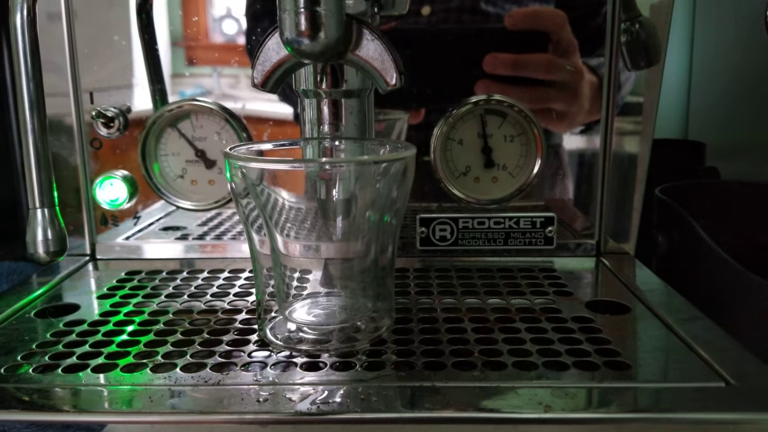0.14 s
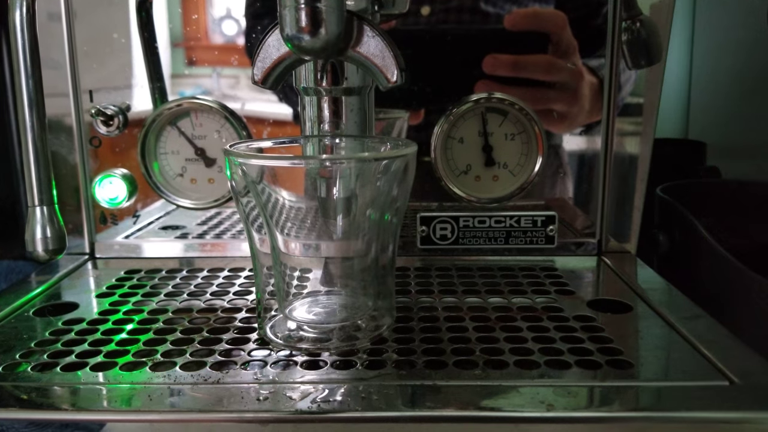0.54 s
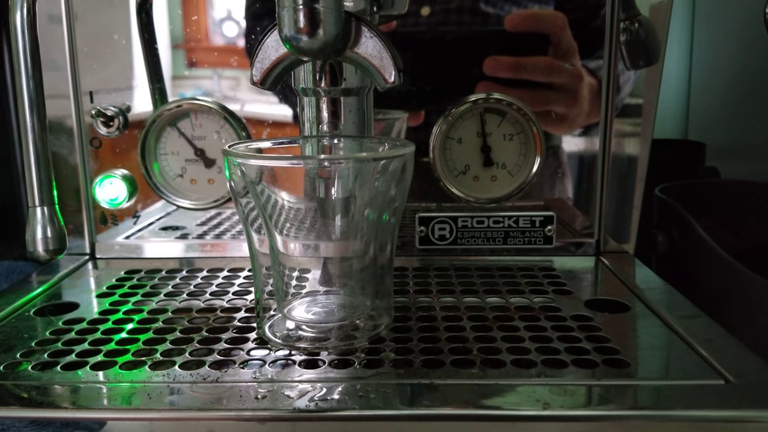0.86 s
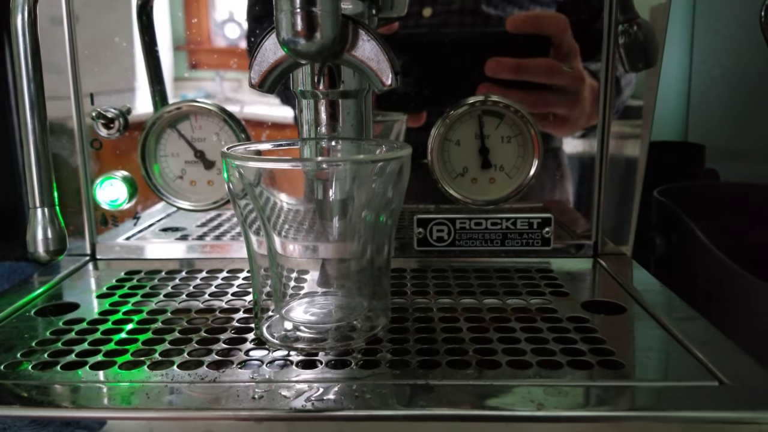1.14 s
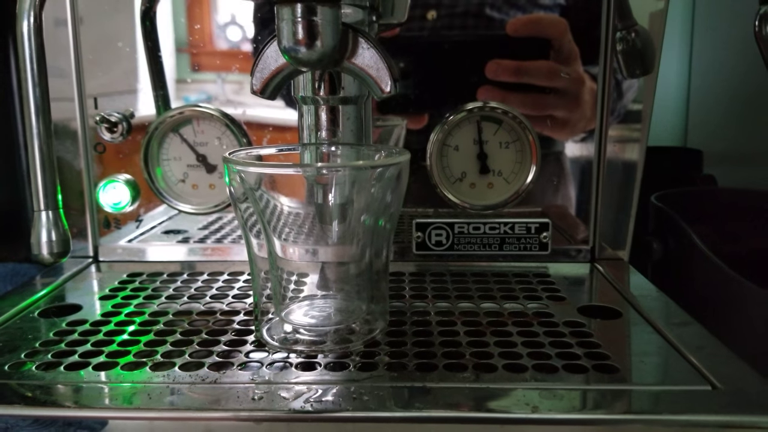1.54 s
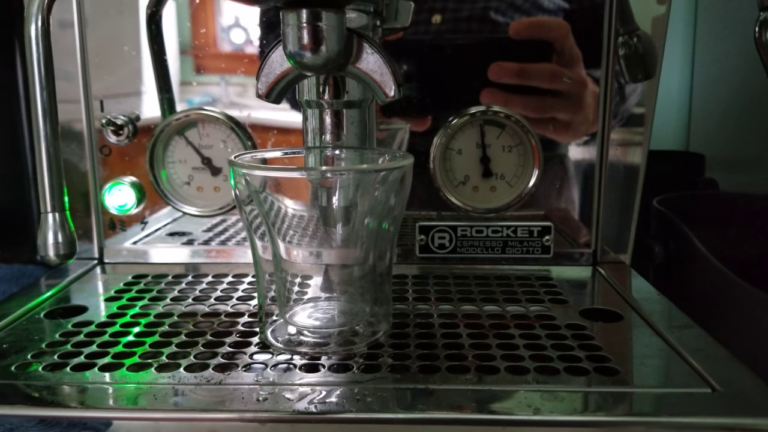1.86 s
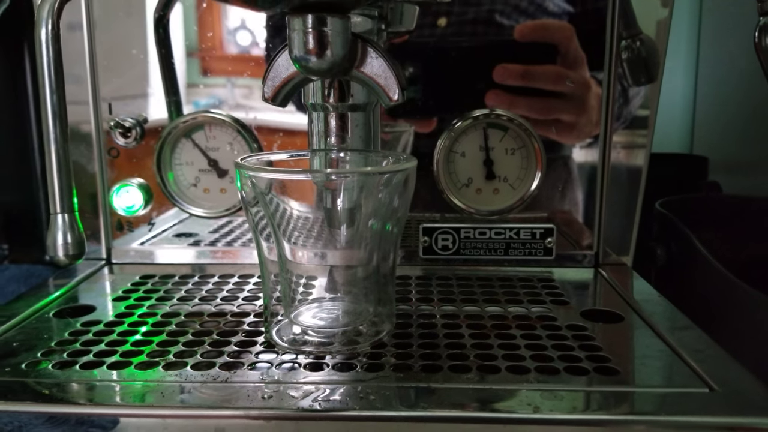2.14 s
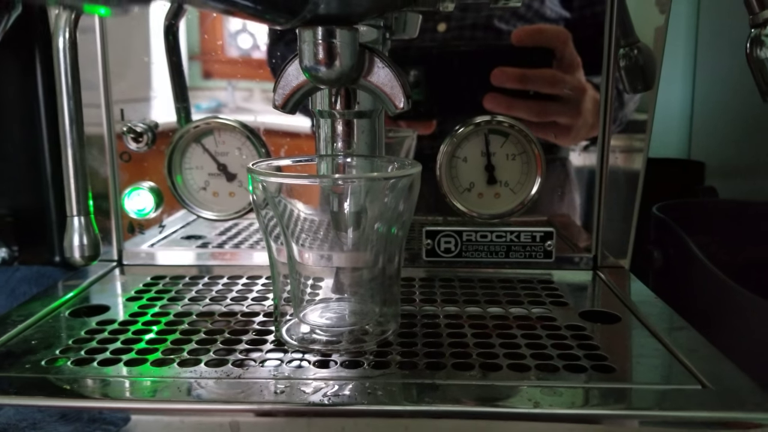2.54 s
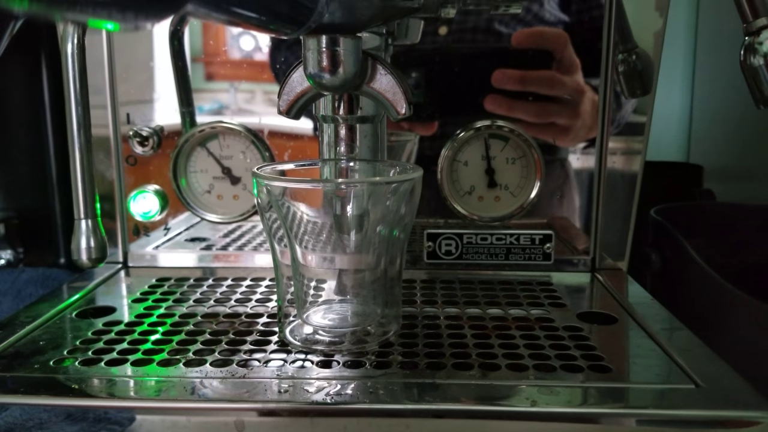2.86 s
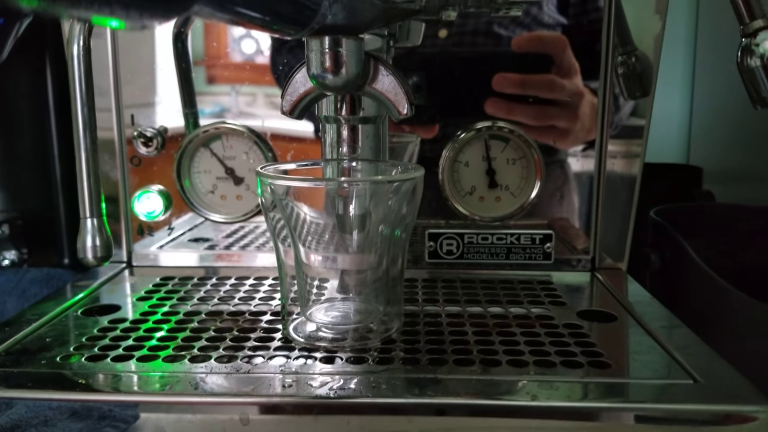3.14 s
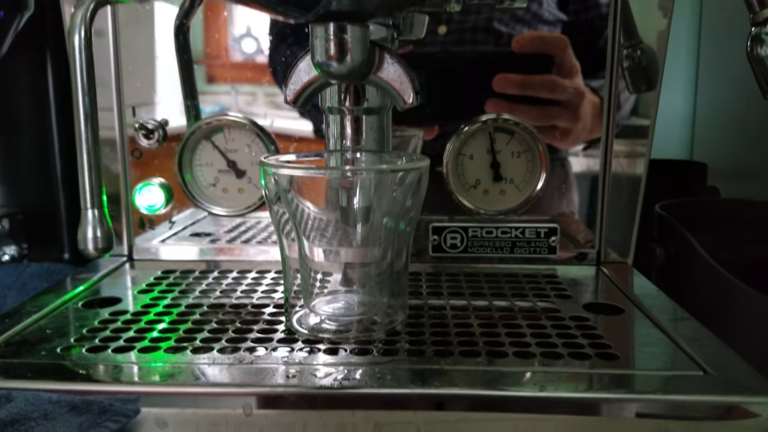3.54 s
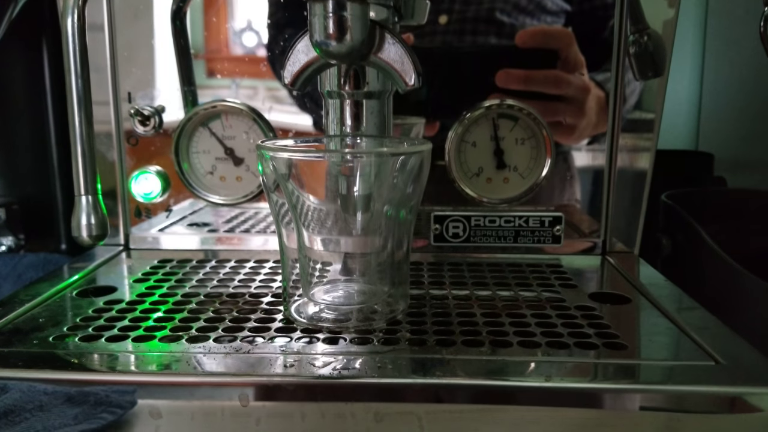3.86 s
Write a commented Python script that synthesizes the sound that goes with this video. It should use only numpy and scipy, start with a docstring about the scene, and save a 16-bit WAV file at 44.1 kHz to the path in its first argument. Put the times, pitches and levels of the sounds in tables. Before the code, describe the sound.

Close up in a kitchen, an espresso machine's pump starts and quickly builds to an even motor hum. A wavering low tone, a fine metallic buzz and the rush of water inside the machine run along with it.

```python
"""In a kitchen, close by, an espresso machine's rotary pump swells in and then holds.
The motor hums on multiples of the mains and makes the steel panels buzz once a cycle.
The pump's vanes add an unsteady tone that beats against the hum.
Water rushes through the pipework, and the steel casing sings softly with it."""
import sys
import numpy as np
from scipy import signal
from scipy.fft import rfft, irfft, next_fast_len
from scipy.io import wavfile
from scipy.ndimage import uniform_filter1d, map_coordinates

SR = 44100
rng = np.random.default_rng(int(sys.argv[2]) if len(sys.argv) > 2 else 0)


def store_pcm(level_fs):
    """Save levels as 16-bit WAV."""
    pcm = np.round(np.clip(level_fs, -1, 1) * 32767).astype(np.int16)
    wavfile.write(sys.argv[1], SR, np.atleast_2d(pcm).T)


N = 176400
MAINS_HZ, SHAFT_HZ = 60.0025, 26.53

# the opening swell (time [s], bass and mid gain [ratio], treble gain [ratio])
SWELL = [(.335, 0, 0.0017), (.35, 0.038, 0.032), (.4, .13, .16), (.53, 0.31, 0.45), (.62, 0.66, 0.72),
         (.8, 0.9, 0.91), (.93, 1, 1)]
# slow level ride on all but the pump (time [s], level [dB], extra buzz [dB])
DRIFT = [(.9, -0.2, 1), (1.4, 0.08, 1), (2.3, 0, 0), (2.6, -1.3, 0), (3.0, -0.93, -0.5), (3.3, 0.35, -0.5),
         (3.9, 0.33, 0)]
# the vanes' tone coming and going (time [s], level [dB])
VANE_LEVEL = [(.7, -52), (1.0, -47.5), (1.2, -55), (1.29, -58), (1.38, -43.5), (1.5, -52.5), (1.67, -70),
              (1.85, -48.5), (2.1, -46), (2.3, -57), (2.5, -44.5), (2.79, -46.5), (2.92, -58),
              (3.15, -48.5), (3.3, -58), (3.6, -63), (3.85, -47.5), (4.0, -54)]
# faint shaft partials (multiple of shaft speed, level [dB], left-right [dB])
SHAFT_PARTIALS = [(2, -74, 0), (10, -60, 0), (16, -66, 0), (105, -73, -7)]
# the hum's partials (multiple of the mains, level [dB], left-right [dB])
HUM_PARTIALS = [(1, -66.8, 0.2), (2, -55.2, -3.8), (3, -47.2, 0.4), (4, -47.5, 0.2), (5, -49.5, -3.5),
                (6, -65.1, -3.5), (7, -63.4, -0.2), (8, -59.5, 3.5), (9, -68.0, -4.4), (10, -66.3, 3.5),
                (11, -71.2, -6.3), (14, -66.7, 4.3), (15, -71.7, -8.8), (17, -64.1, 28.3),
                (29, -63.9, 11.7), (59, -75.8, -10.7), (79, -76.3, -4.4), (105, -73.2, -7.2),
                (130, -77.1, -13.0)]
# tone colour of the panel buzz (frequency [Hz], level per partial [dB])
BUZZ_SPECTRUM = [(720, -74), (1200, -77), (1800, -76.5), (2100, -86), (2800, -78), (3500, -80.5),
                 (4000, -79.5), (4500, -87), (5400, -82), (6300, -81), (7400, -81), (8400, -88.5),
                 (9200, -99), (9900, -94.5), (10500, -113)]
# panning of buzz, rush and casing (frequency [Hz], left-right [dB])
PAN = [(150, -1), (660, -2), (1050, 4.5), (1700, 2), (2700, -2.5), (3800, -6), (6300, -4), (7400, -7),
       (9900, -5), (10400, 0)]
# water and bearing noise through the casing (frequency [Hz], density [dB per Hz])
RUSH_SPECTRUM = [(20, -99), (50, -90.5), (100, -84), (160, -78), (215, -74.5), (275, -74), (360, -80.5),
                 (450, -84), (530, -79.5), (660, -85.5), (800, -89), (1000, -85.5), (1150, -91),
                 (1550, -94.5), (1740, -89.5), (2000, -97), (2400, -100), (2750, -93), (3000, -95.5),
                 (3780, -92.5), (4600, -99), (5400, -99), (6400, -100), (7400, -103), (8600, -110),
                 (9900, -112.5), (10300, -118), (12500, -114.2), (15600, -113.5)]
# stereo image of the rush (frequency [Hz], left-right correlation [ratio])
RUSH_CORRELATION = [(30, 0.55), (120, 0.93), (280, 0.92), (500, 0.34), (1000, 0.32), (3000, 0),
                    (15000, 0.022)]
# narrow resonances of the steel casing (frequency [Hz], half-width [Hz], level [dB])
CASING_RINGS = [(1004, 41, -69.5), (1760, 89, -67), (2775, 50, -73), (3780, 49, -71.5), (4740, 30, -82),
                (6380, 54, -77.5)]


def amp(db):
    """Gain of a level in dB."""
    return 10 ** (np.asarray(db) / 20)


def unit(x):
    """x brought to rms 1."""
    return x / np.sqrt(np.mean(np.abs(x) ** 2) + 1e-20)


def along(rows, hz):
    """A two-column table read on a log frequency axis."""
    freqs, values = np.transpose(rows)
    return np.interp(np.log(hz + 1), np.log(freqs + 1), values)


def curves(rows):
    """One automation curve for each column after the time."""
    times, *cols = np.transpose(rows)
    return [np.interp(np.arange(N) / SR, times, c) for c in cols]


def wobble(rate):
    """A smooth random curve, rate knots a second."""
    knots = rng.standard_normal(int(N * rate / SR) + 4)
    return map_coordinates(knots, [np.arange(N) * rate / SR])


def placed(db, pan_db):
    """Left and right gains of a level and a pan."""
    pair = np.array([amp(pan_db / 2), amp(-pan_db / 2)]).reshape(2, -1)
    return amp(db) * pair / np.sqrt(np.mean(pair ** 2, axis=0))


def filtered(x, response):
    """x through an EQ curve given as a function of frequency."""
    size = next_fast_len(N + SR // 2)
    return irfft(rfft(x, size) * response(np.fft.rfftfreq(size, 1 / SR)), size)[..., :N]


def tone(hz, flutter_db, waver_rad, start_rad=0):
    """An unsteady stereo sine of rms 1; higher tones sit wider in phase, up to a limit."""
    phase = 2 * np.pi * hz * np.arange(N) / SR + start_rad + waver_rad * wobble(9)
    spread_rad = min((hz / 460) ** 2, 0.89)
    lead = (-1) ** round(hz / MAINS_HZ) * spread_rad / 2
    return unit(amp(flutter_db * wobble(11)) * np.sin([phase + lead, phase - lead]))


def pump():
    """The vanes' tone, eight pulses a turn, comes and goes over faint partials of the shaft."""
    vane_db, = curves(VANE_LEVEL)
    vanes = amp(vane_db) * tone(8 * SHAFT_HZ, flutter_db=0.4, waver_rad=.3)
    shaft = sum(placed(db, pan) * tone(k * SHAFT_HZ, flutter_db=1, waver_rad=0.46)
                for k, db, pan in SHAFT_PARTIALS)
    return vanes + shaft


def motor():
    """One push per mains cycle, smeared in time by the casing into a hum."""
    return sum(placed(db, pan) * tone(k * MAINS_HZ, flutter_db=.9, waver_rad=.05, start_rad=.6 * k ** 2)
               for k, db, pan in HUM_PARTIALS)


def buzz_cycle(size=8192, contact_decay_s=0.00036):
    """One mains cycle of rattling steel: a contact and its ringing, between the hum's partials."""
    t = np.arange(size) / size / MAINS_HZ
    spectrum = rfft(rng.standard_normal((2, size)) * (1 + np.exp(-t / contact_decay_s)))
    evened = unit(spectrum / np.sqrt(np.abs(spectrum)))
    k = np.arange(spectrum.shape[1])
    hz = k * MAINS_HZ
    free = (k > 0) & ~np.isin(k, [row[0] for row in HUM_PARTIALS]) & (hz < BUZZ_SPECTRUM[-1][0])
    colour = placed(along(BUZZ_SPECTRUM, hz), along(PAN, hz))
    return irfft(evened * free * colour) * size / np.sqrt(2)


def panels(change=.27, jitter_s=2e-6):
    """The panels repeat the same rattle every cycle, while a part of it keeps changing."""
    position = (np.arange(N) / SR + jitter_s * wobble(40)) * MAINS_HZ % 1
    new_loop = lambda: np.array([np.interp(position, np.arange(len(c)) / len(c), c)
                                 for c in buzz_cycle()])
    changing = (wobble(1.56) * new_loop() + wobble(6.98) * new_loop()) / np.sqrt(2)
    return (new_loop() + change * changing) / np.hypot(1, change)


def water(patchy_db=1.0, pulse_depth=0.13):
    """A patchy rush, coloured by the casing and pulsing with the motor at twice the mains."""
    grains = signal.stft(rng.standard_normal((2, N)), nperseg=512)[2]
    patches = rng.standard_normal(grains.shape[1:])
    for axis in (0, 1):  # blur over frequency, then time
        patches = uniform_filter1d(patches, size=8, axis=axis)
    rush = unit(signal.istft(grains * amp(patchy_db * unit(patches)), nperseg=512)[1][:, :N])
    rush *= 1 + pulse_depth * np.sin(2 * np.pi * 2 * MAINS_HZ * np.arange(N) / SR)
    width = lambda hz: np.arccos(along(RUSH_CORRELATION, hz)) / 2
    mid, side = filtered(rush, lambda hz: np.array([np.cos(width(hz)), np.sin(width(hz))]))
    colour = lambda hz: placed(along(RUSH_SPECTRUM, hz), along(PAN, hz))
    return np.sqrt(SR / 2) * filtered(np.array([mid + side, mid - side]), colour)


def casing():
    """The steel sings softly under the rush: a narrow band of noise for each resonance."""
    rings = np.zeros((2, N))
    for centre, width, db in CASING_RINGS:
        ring = filtered(rng.standard_normal((2, N)), lambda hz: 1 / (1 + ((hz - centre) / width) ** 2))
        rings += placed(db, along(PAN, centre)) * unit(ring)
    return rings


def scene():
    """All layers swell in together, the treble a little sooner."""
    low_gain, high_gain = curves(SWELL)
    drift_db, buzz_db = curves(DRIFT)
    machine = pump() + amp(drift_db) * (motor() + amp(buzz_db) * panels() + water() + casing())
    low = filtered(machine, lambda hz: 1 / (1 + (hz / 2700) ** 6))  # crossover
    return low_gain * low + high_gain * (machine - low)


def record(dry):
    """A brick-wall high cut takes off the top air."""
    return filtered(dry, lambda hz: hz < 15750)


dry = scene()
out = record(dry)
store_pcm(out)
```